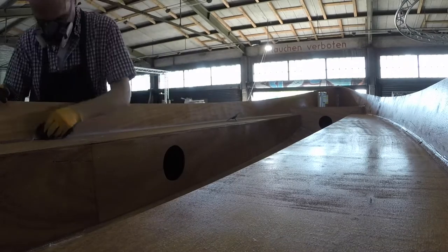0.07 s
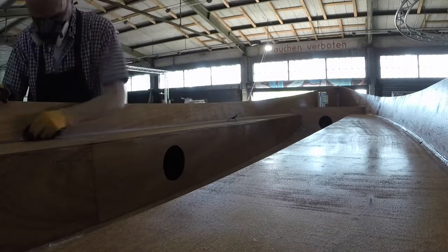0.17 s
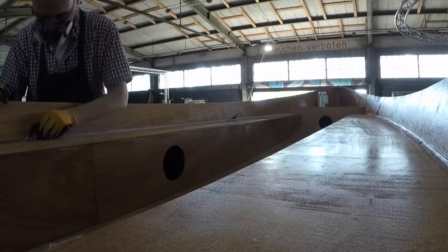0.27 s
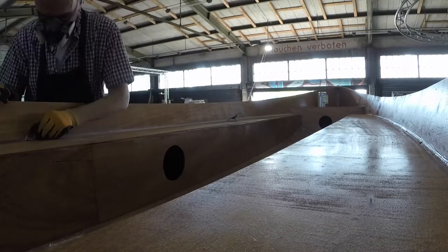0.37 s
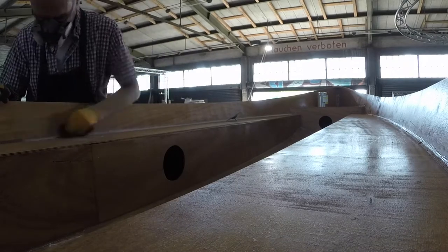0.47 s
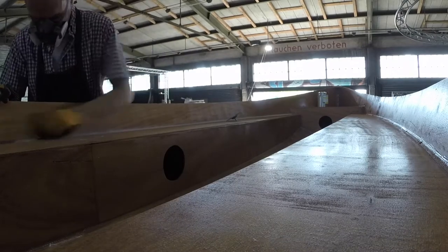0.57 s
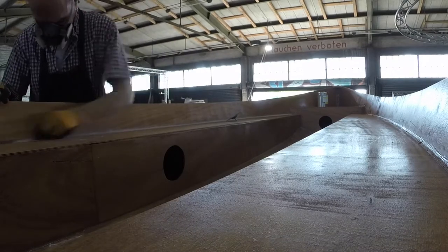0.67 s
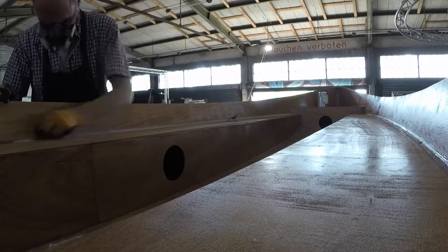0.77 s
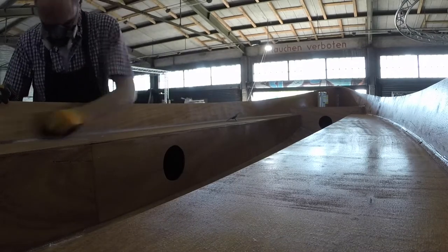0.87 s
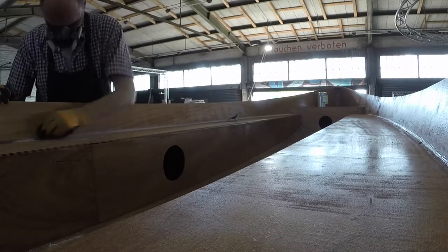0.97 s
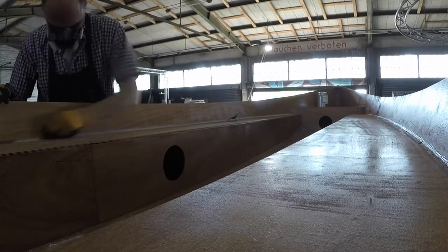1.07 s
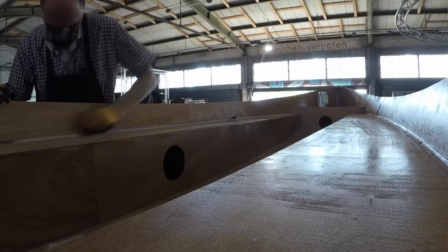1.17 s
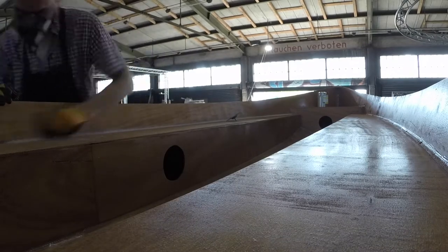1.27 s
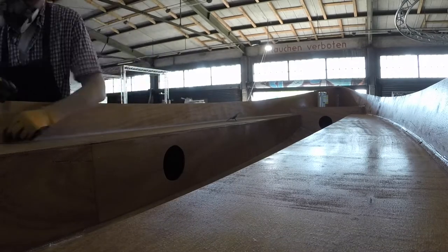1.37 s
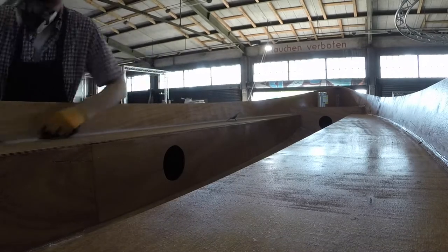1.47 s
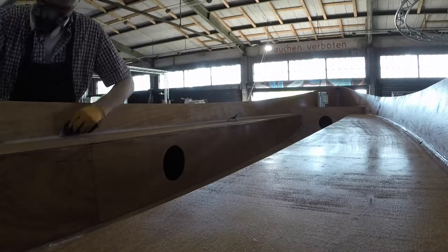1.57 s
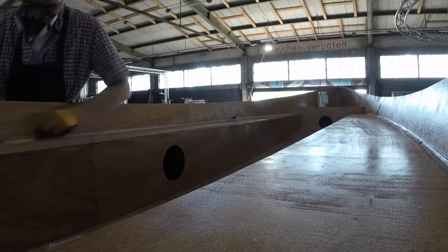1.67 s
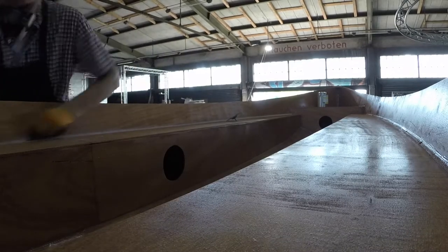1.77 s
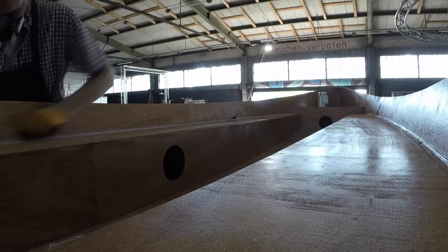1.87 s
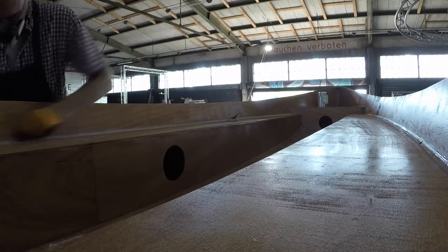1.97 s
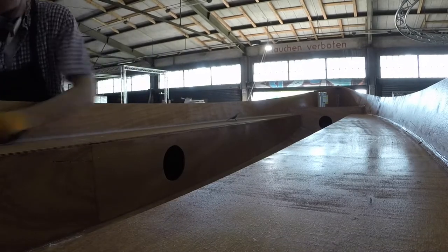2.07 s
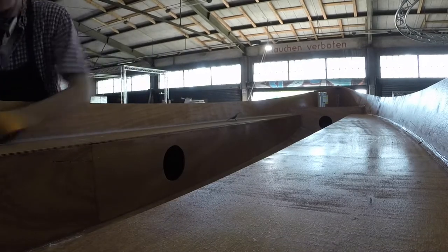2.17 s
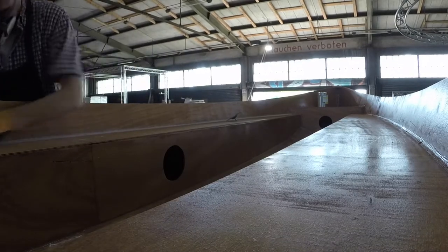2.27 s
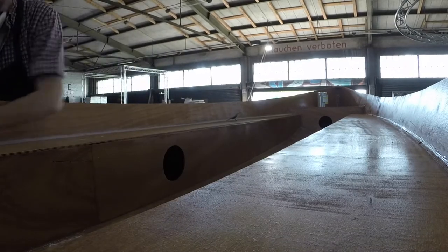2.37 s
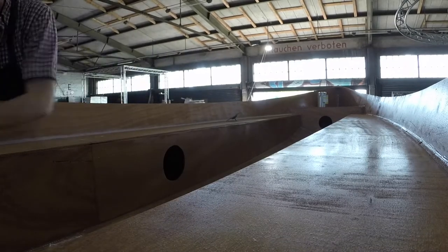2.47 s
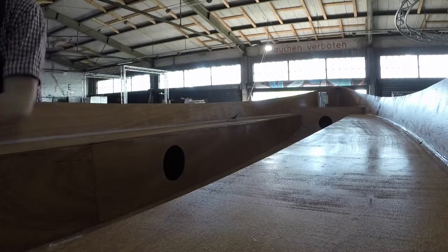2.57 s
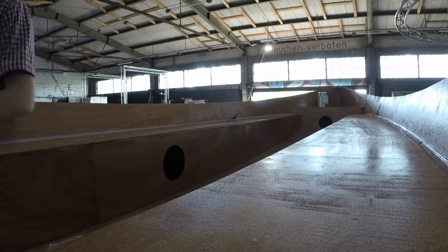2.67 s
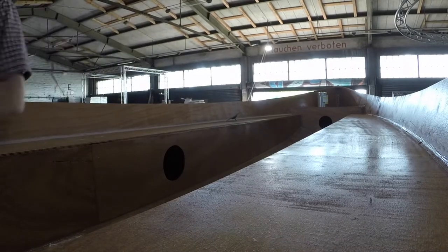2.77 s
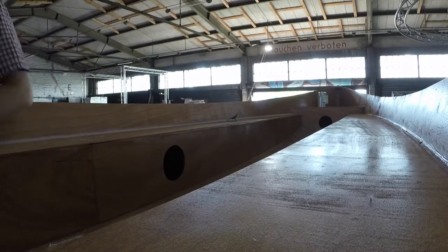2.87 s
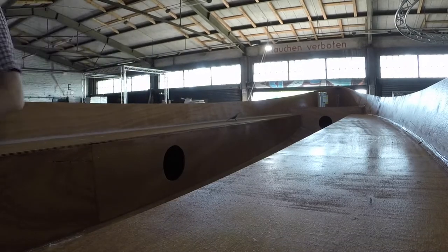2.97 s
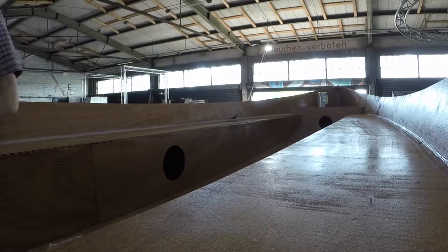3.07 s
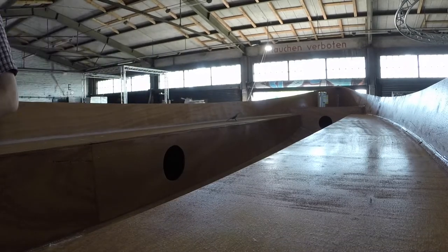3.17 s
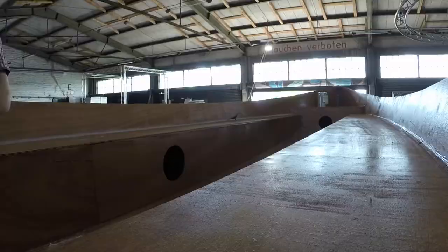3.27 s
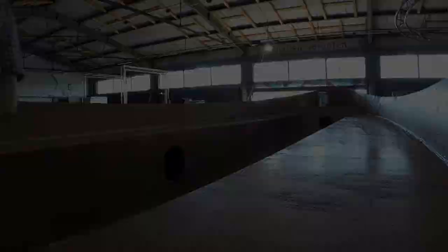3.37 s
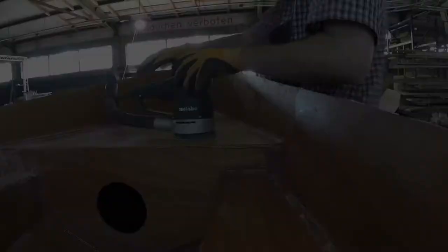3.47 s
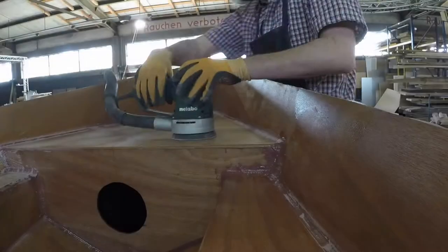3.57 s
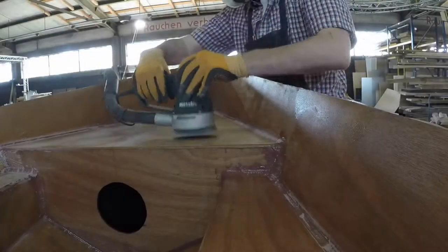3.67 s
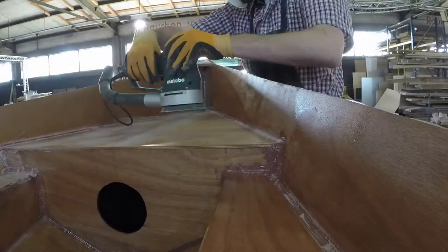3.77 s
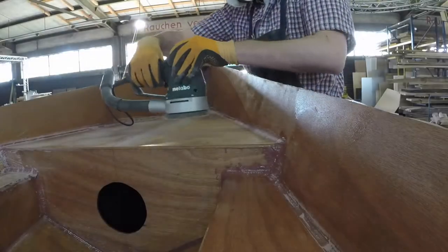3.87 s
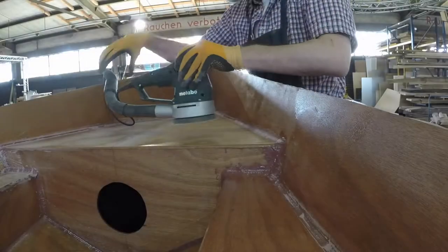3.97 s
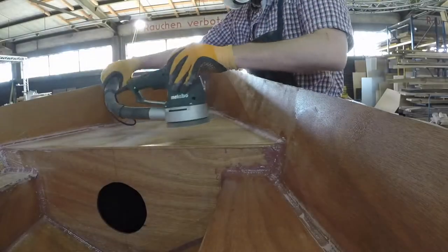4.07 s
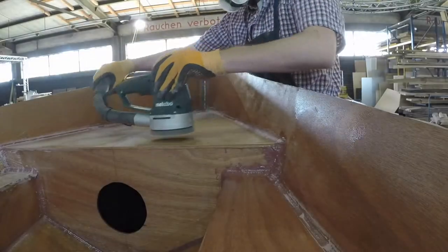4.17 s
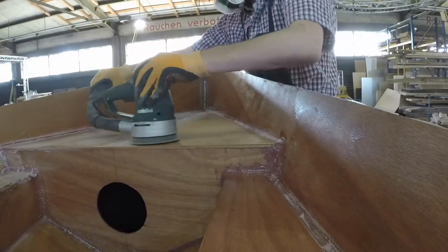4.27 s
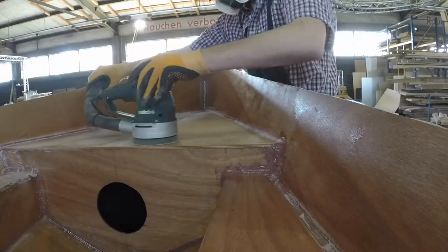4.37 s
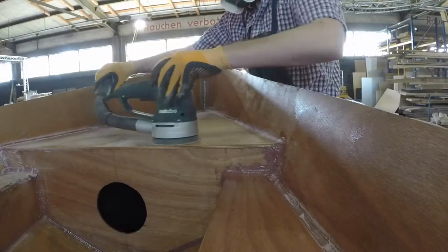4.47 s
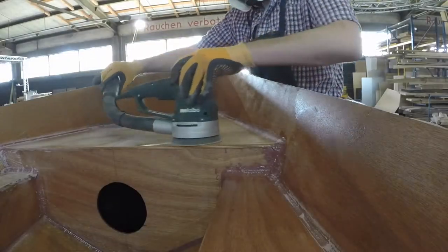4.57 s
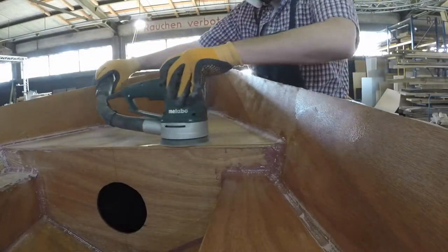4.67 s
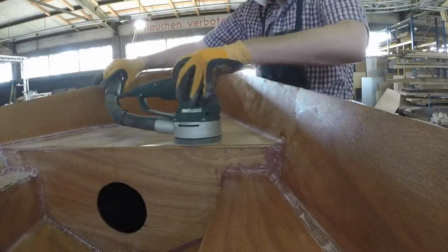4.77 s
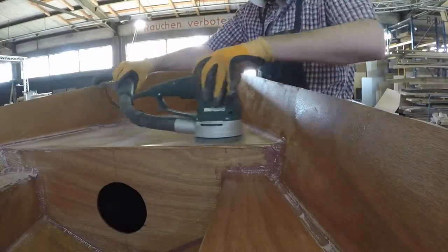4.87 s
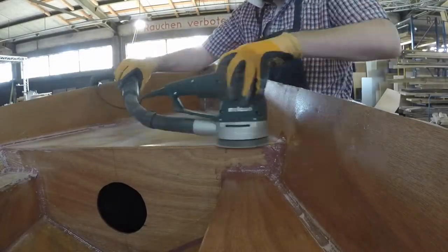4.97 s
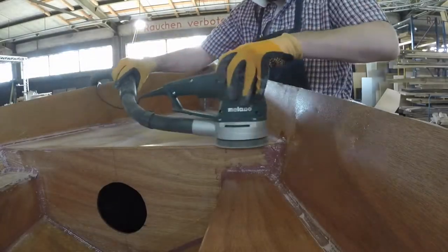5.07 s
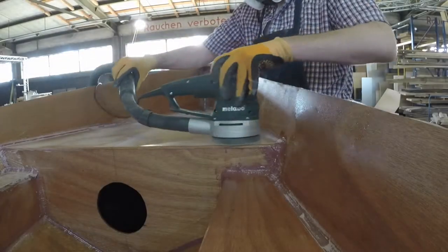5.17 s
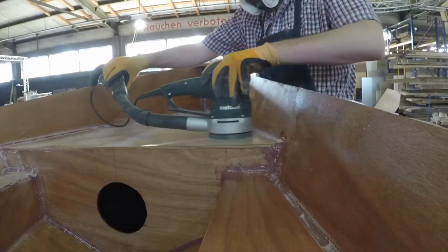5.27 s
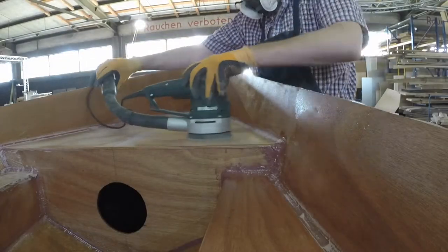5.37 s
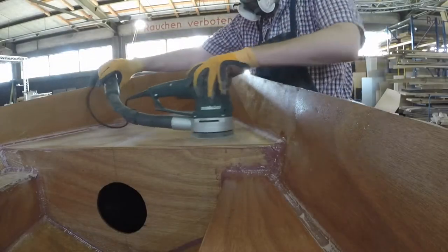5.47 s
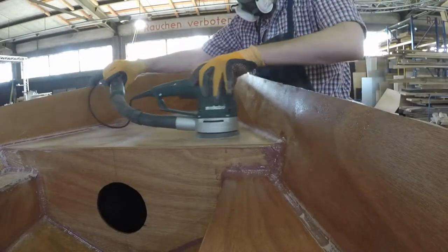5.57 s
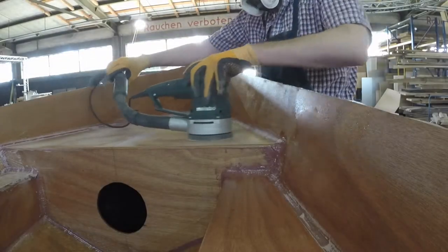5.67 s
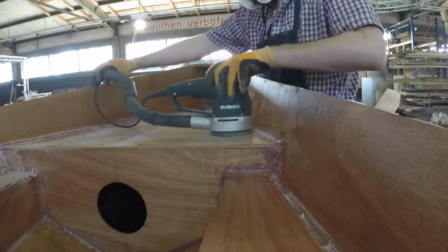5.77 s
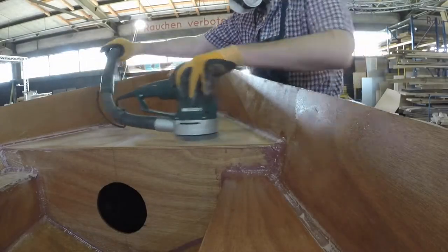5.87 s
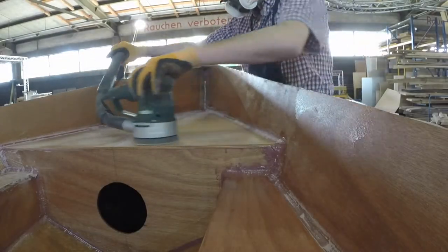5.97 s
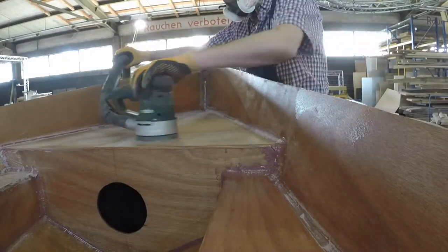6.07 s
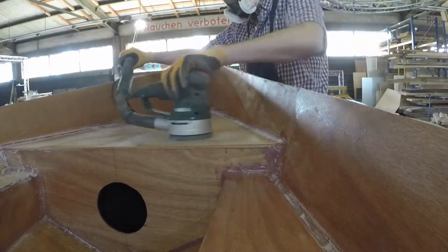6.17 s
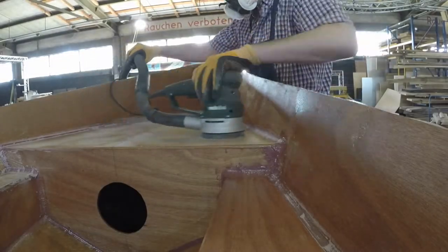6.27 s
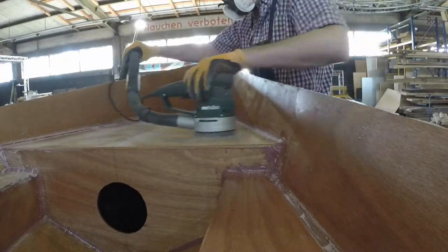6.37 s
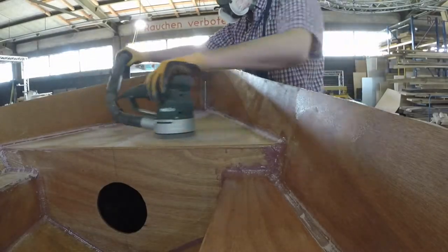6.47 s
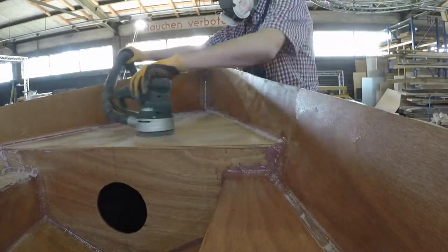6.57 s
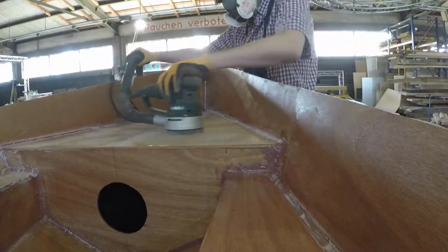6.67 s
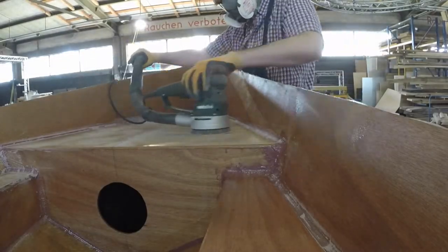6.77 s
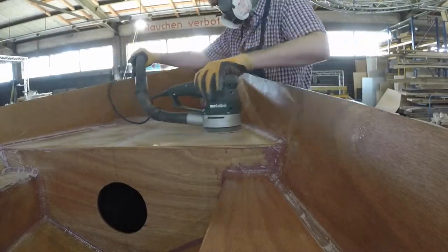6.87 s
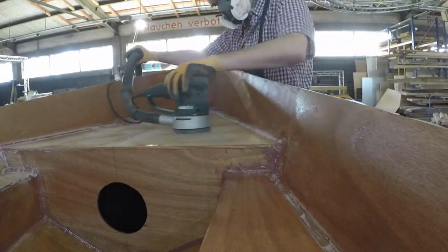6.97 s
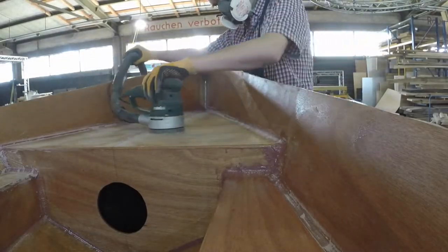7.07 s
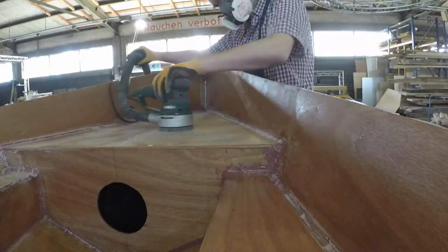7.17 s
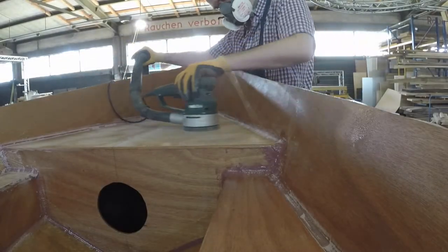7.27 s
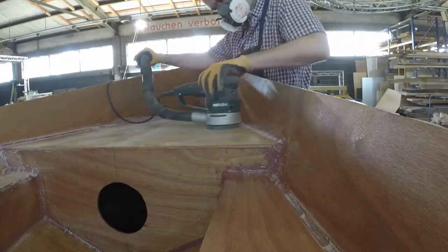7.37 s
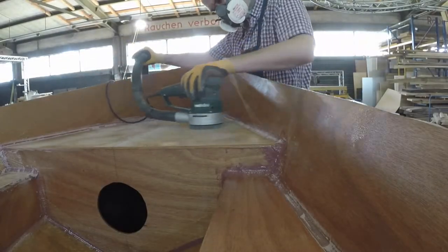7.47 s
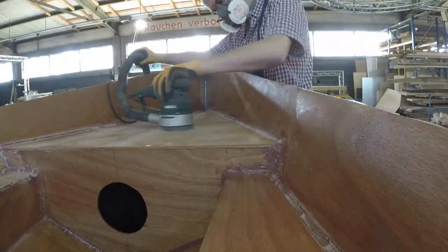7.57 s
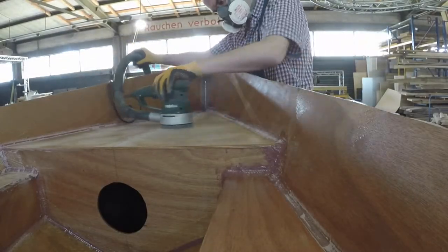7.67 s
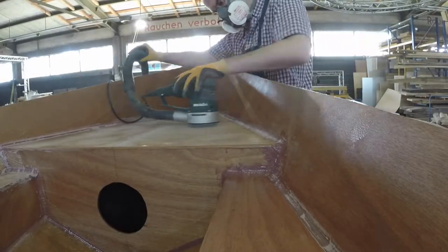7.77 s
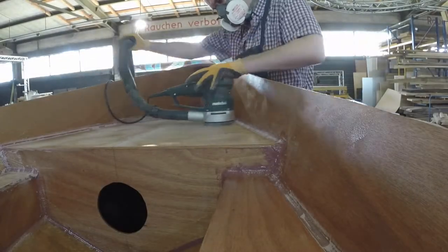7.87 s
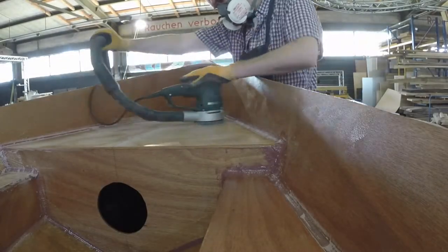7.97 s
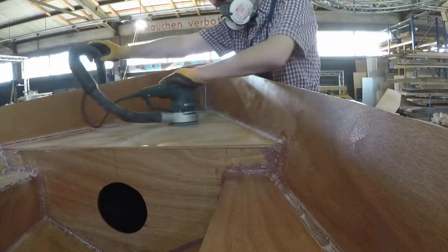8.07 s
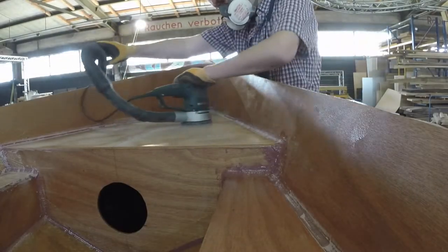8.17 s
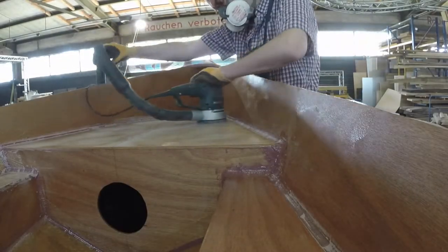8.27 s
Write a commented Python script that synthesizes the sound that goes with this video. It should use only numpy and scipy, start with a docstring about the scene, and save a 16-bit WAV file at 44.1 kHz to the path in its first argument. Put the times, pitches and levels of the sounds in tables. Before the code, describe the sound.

Close to a hollow plywood boat hull in a quiet workshop, sandpaper scrubs rapidly back and forth, dry scratches over a low woody rumble. Short hollow knocks and tiny ticks interrupt it. The strokes thin out into near silence, then an orbital sander whirs up, sags under load and settles into a buzzing drone with gritty hiss and a thin whine.

```python
"""Quick sandpaper strokes scrub a hollow plywood hull: swelling noise scratches, rumbles and shoves it.
Bumps ring the wood as fading tones, and small dry ticks fall among the strokes.
After a hush an orbital sander fades in: its orbit spins up, then sags under load. Multiples of the turn
drum the boards, with noise for loose rattle, hissing grit and air, and a fan whine on top. Low thuds join.
Faint air noise lies behind it all, later with two steady tones; a small microphone box colours the mix."""
import sys
import numpy as np
from scipy import signal
from scipy.fft import rfft, irfft
from scipy.io import wavfile
from scipy.ndimage import uniform_filter1d

SR = 44100
rng = np.random.default_rng(int(sys.argv[2]) if len(sys.argv) > 2 else 0)


def bounce(signal):
    """Save signal as a 16-bit WAV file at the path given by the first command-line argument."""
    frames = np.transpose(np.atleast_2d(signal))
    limited = np.clip(frames, -1, 1)
    pcm = np.round(limited * 32767).astype(np.int16)
    wavfile.write(sys.argv[1], SR, pcm)


N = 367353
T = np.arange(N) / SR  # time of every sample, in seconds

# All "level per Hz" spectra give a shape only; the loudness is set elsewhere.
# quiet air of the hall: (f/Hz, level per Hz/dB)
AIR_SPECTRUM = [(18, -39), (30, 0), (77, -9), (462, -9), (615, -11), (1490, -40), (2580, -34), (15100, -61)]
# steady tones of the hall: (f/Hz, average level/dB)
HALL_TONES = [(296.1, -73), (409.1, -67)]
AIR_DB = -57

# small ticks: (t/s, level/dB)
TICKS = [(0.3464, -57), (0.3556, -57), (0.378, -47), (1.6024, -49), (3.2755, -45), (3.3039, -55)]
# small cavities round the microphone that ring with each tick: (f/Hz, width/Hz, relative level/dB)
CAVITIES = [(2940, 250, -5), (5660, 200, -4), (7700, 300, -13), (10300, 370, -9)]
SNAP_DB, SNAP_S = -15, 0.002  # dry crackle at the front of each tick: level against the ring, fading time

# low thuds while sanding: (t/s, peak level/dB, f/Hz, length/s)
THUDS = [(4.93, -33, 151.9, 0.083), (5.02, -34, 80.3, 0.043), (5.913, -34, 120.4, 0.048),
         (7.712, -26, 279, 0.049)]
# bumps on the hull: (t/s, peak level/dB, hardness as pulse cut-off f/Hz)
BUMPS = [(0.582, -42, 800), (1.004, -33, 900), (1.62, -23.5, 476), (1.649, -27.5, 420), (1.876, -24.5, 900),
         (2.098, -21.5, 1050), (2.402, -23, 810), (2.834, -29.5, 650), (2.92, -26, 740), (2.938, -36, 600),
         (3, -27, 3200), (3.262, -35.5, 490), (3.501, -42, 800)]
# ringing tones (modes) of the hull: (f/Hz, relative level/dB, time to fade by 60 dB/s)
HULL_MODES = [(280, -14.5, 0.064), (419, 0, 0.051), (527.5, 4.5, 0.042), (660, -20, 0.055),
              (797, 13, 0.026), (1177, 7, 0.043), (1340, -5, 0.079), (1460, 11, 0.026), (1950, 1, 0.021),
              (2250, 3, 0.016), (2950, -6, .021)]

# sandpaper strokes, single or in even runs that begin with a push:
# (start t/s, end t/s before the overlap, count, scratch level/dB, hull rumble level/dB)
STROKES = [(0.0, 0.049, 1, -40.5, -31.5), (0.038, 0.094, 1, -56, -41.5), (0.125, 0.252, 2, -44, -31.5),
           (0.25, 0.28, 1, -56.5, -40), (0.284, 0.389, 2, -80, -52), (0.455, 0.487, 1, -73, -73),
           (0.494, 0.558, 1, -47, -34), (0.557, 0.673, 2, -42, -30), (0.673, 1.086, 8, -39.5, -33),
           (1.086, 1.211, 2, -40.5, -36), (1.211, 1.313, 1, -38, -31.5), (1.306, 1.362, 1, -42.5, -39),
           (1.365, 1.444, 1, -43, -36.5), (1.402, 1.556, 1, -57, -44), (1.556, 1.597, 1, -60, -50),
           (1.6, 1.646, 1, -55, -34.5), (1.653, 1.793, 1, -57, -49), (1.726, 1.801, 1, -42, -35),
           (1.801, 1.854, 1, -42, -33), (1.852, 2.742, 17, -40, -33), (2.738, 2.79, 1, -61, -49),
           (2.823, 2.857, 1, -63, -44), (2.85, 2.902, 1, -56, -44.5), (2.912, 2.953, 1, -54, -37),
           (2.995, 3.016, 1, -54, -29.5), (3.026, 3.088, 1, -59.5, -42), (3.085, 3.153, 2, -58.5, -43),
           (3.263, 3.293, 1, -64, -76), (3.319, 3.446, 2, -68, -70), (3.446, 3.53, 2, -62, -52.5)]
# dull part of the paper's scratch: (f/Hz, level per Hz/dB)
SCRATCH_SPECTRUM = [(530, -31), (900, 0), (1060, -9.5), (1250, 4.5), (1500, -5.5), (1740, -14.5),
                    (1890, -12), (2970, -14), (3540, -17.5), (6320, -19.5), (7190, -39), (10300, -42.5),
                    (15100, -66)]
# brightest part of the scratch: (f/Hz, level per Hz/dB)
FIZZ_SPECTRUM = [(3800, -5.5), (4600, -6), (5200, -6), (6400, -4.5), (7300, -13.5), (10000, -11.5),
                 (15000, -27.5)]
# hull shaking under the paper: (f/Hz, level per Hz/dB)
RUMBLE_SPECTRUM = [(88, -72), (150, -20), (405, -6), (451, -8), (528, 0), (737, -3.5), (916, -16),
                   (1100, -24), (1430, -28), (2420, -120)]
# low shove of the hand on the hull: (f/Hz, level per Hz/dB)
SHOVE_SPECTRUM = [(15, -16), (35, -4.5), (70, 2), (130, -3), (300, -59)]
# change for the weaker pull back in a longer run: (scratch level/dB, rumble level/dB, shove level/dB)
PULL_BACK_DB = -2, -1, -4
# chance spread between strokes of a longer run: (scratch level/dB, rumble level/dB, shove level/dB)
UNEVEN_DB = 0.3, 1.2, 5.5
OVERLAP = 1.08  # a stroke lasts this many times the step to the next
PULL_LATE_S = 0.001  # in a longer run each pull back starts this much late
FIRM_RUMBLE_DB, SHOVE_DB = -33, -51.5  # rumble and low shove of a firm stroke
SHOVE_FOLLOW = 0.42  # dB that the shove gains per dB of rumble

# orbit of the pad, before small chance wavers:
# (t/s, turns per second/Hz, average level/dB of the first, second and third multiple)
ORBIT = [(3.92, 56.04, -88, -63, -70), (3.99, 59.8, -62, -59, -58), (4.34, 82.8, -66, -47.5, -51),
         (4.45, 82.9, -49, -50.5, -46), (4.66, 73.3, -57, -37, -46), (4.86, 70.2, -44, -51.5, -52),
         (5.02, 67.8, -50, -49, -54.5), (5.29, 70.04, -52, -52, -53), (5.43, 65.6, -38.5, -45, -55),
         (5.6, 63.4, -52, -47, -54), (5.84, 63.4, -50, -46, -42.5), (6.44, 63.85, -50.5, -45.5, -50.5),
         (6.87, 61.44, -45, -48, -35.5), (7.0, 59.9, -52, -36.5, -44.5), (7.22, 62.3, -42, -37, -33.5),
         (7.3, 62.64, -50, -46, -39), (7.59, 61.1, -44, -35, -37.5), (7.91, 63.03, -54, -39.5, -38),
         (8.1, 62.5, -42, -35.5, -54), (8.33, 65.3, -38, -37, -32)]
# pad on the wood: (t/s, drumming level/dB, hiss level/dB, share of clean drumming/0-1)
PAD = [(3.6, -64, -64, 0.78), (3.76, -57, -59, 0.5), (3.77, -55.5, -56.5, 0.54), (4.05, -40, -50.5, 0.75),
       (4.43, -34.5, -47.5, 0.84), (4.51, -36, -43.5, 0.75), (5.13, -31.5, -43.5, 0.81),
       (5.51, -31.5, -39, 0.78), (5.9, -27.5, -40.5, 0.77), (6.16, -31.5, -40, 0.76),
       (6.23, -26.5, -36, 0.8), (6.48, -28, -40, 0.75), (6.5, -33, -37.5, 0.84), (6.7, -26.5, -38.5, 0.8),
       (6.97, -27.5, -34, 0.76), (7.17, -30, -38, 0.73), (7.21, -24, -37, 0.67), (7.3, -29.5, -36, 1),
       (7.35, -25.5, -36, 0.8), (7.63, -29.5, -35.5, 0.72), (7.68, -27.5, -39, 0.71),
       (7.96, -23.5, -35, 0.94), (8.14, -27, -38.5, 0.74), (8.33, -29.5, -35.5, 0.78)]
# how strongly the board answers the upper multiples: (f/Hz, relative level/dB)
DRUM_RESPONSE = [(200, -22), (250, -12.5), (310, -8.5), (375, -17), (440, -11), (500, -3), (545, -4.5),
                 (630, 0), (700, -3), (760, -9), (830, -14.5), (1000, -68)]
# loose rattle between the multiples: (f/Hz, level per Hz/dB)
RATTLE_SPECTRUM = [(18, -46), (30, -21), (183, -5), (236, -11), (310, -2.5), (361, -2), (487, -1), (630, 7),
                   (1100, -12.5), (1430, -62), (2420, -120)]
# hiss of grit and air: (f/Hz, level per Hz/dB)
HISS_SPECTRUM = [(530, -11.5), (900, 2), (966, -7), (1190, -7.5), (1550, -13), (2930, -11.5), (3540, -17.5),
                 (4590, -8), (5230, -15), (6470, -17), (8490, -24.5), (9440, -22), (13000, -36.5),
                 (15100, -50)]
# brighter hiss of the biting grit: (f/Hz, level per Hz/dB)
BITE_SPECTRUM = [(1200, -34), (1800, 1.5), (4000, -0.5), (7000, -8), (9000, -15), (13000, -15.5),
                 (15000, -23)]
FAN_MULTIPLE, WHINE_DB = 19, -14.5  # fan blades: multiple of the orbit, peak against the hiss once pressed
PRESS_S = 4.44  # time at which the pad starts to be pressed down
ROCK_DB, ROCK_HZ = 2.6, 13  # the low multiples waver as the pad rocks

# humps and dips of the microphone box: (f/Hz, width/Hz, level/dB)
BOX = [(1690, 67, -1.5), (2990, 590, 5), (3520, 220, -4.5), (8460, 210, -5), (11500, 950, -4)]
EDGE_HZ = 15290  # top of the microphone's band


def amp(db):
    """Turns decibels into a plain multiplying factor."""
    return 10 ** (np.asarray(db) / 20)


def evened(x):
    """Scales x to an average (rms) level of one."""
    return x / np.sqrt(np.mean(abs(x) ** 2) + 1e-20)


def columns(rows):
    """Draws straight lines between the timed rows of a table, one curve for each column."""
    s, *values = np.transpose(rows)
    return [np.interp(T, s, v) for v in values]


def read(points, hz):
    """Reads a spectrum between its points, on a pitch-like (logarithmic) scale."""
    f, value = np.transpose(points)
    return np.interp(np.log(hz + 1), np.log(f + 1), value)


def colour(x, spectrum):
    """Gives x the spectrum, scaled so that unit white noise comes out at unit level."""
    gain = evened(amp(read(spectrum, np.fft.rfftfreq(N, 1 / SR))))
    return irfft(rfft(x) * gain, N)


def slow(hz):
    """Smooth chance wandering of unit level, up to about hz."""
    width = max(round(SR / hz), 1)
    once = uniform_filter1d(rng.standard_normal(N), width)
    return evened(uniform_filter1d(once, width))


def grit(spread_db, flutter_hz):
    """Noise whose level flutters by chance, as when grains catch and slip."""
    return evened(rng.standard_normal(N) * amp(spread_db * slow(flutter_hz)))


def add(mix, s, sound):
    """Adds a sound to the mix at time s, cut off at the end of the mix."""
    part = mix[round(s * SR):][:len(sound)]
    part += sound[:len(part)]


def hall():
    """Quiet air noise; from 3.4 s it drops while two faint, wavering tones rise."""
    later = np.clip((T - 3.4) / 0.13, 0, 1)
    tones = 0
    for hz, db in HALL_TONES:
        tones = tones + np.sqrt(2) * amp(db + 1.5 * slow(11.0)) * np.sin(2 * np.pi * hz * T)
    air = colour(grit(5.3, 12), AIR_SPECTRUM)
    return amp(AIR_DB - 11.5 * later) * air + tones * later


def ticks():
    """Short dry bursts that ring the small cavities round the microphone."""
    out, t = np.zeros(N), T[:400]
    for s, db in TICKS:
        ring = 0
        for hz, width, mode_db in CAVITIES:
            # a wider resonance dies sooner
            ring = ring + amp(mode_db) * np.sin(2 * np.pi * hz * t) * np.exp(-np.pi * width * t)
        build_up = 1 - np.exp(-t / 0.00072)
        snap = amp(SNAP_DB) * rng.standard_normal(len(t)) * np.exp(-t / SNAP_S)
        add(out, s, amp(db) * (ring * build_up + snap))
    return out


def thuds():
    """Each low thud is one steady pitch that swells and fades smoothly."""
    out = np.zeros(N)
    for s, db, hz, length in THUDS:
        t = np.arange(0, length, 1 / SR)
        swell = np.sin(np.pi * t / length) ** 2
        add(out, s, amp(db) * swell * np.sin(2 * np.pi * hz * t))
    return out


def bumps():
    """A soft pulse rings the hull modes; harder blows reach the higher ones."""
    out, t = np.zeros(N), T[:6000]
    for s, db, hard_hz in BUMPS:
        ring = 0
        for (hz, mode_db, t60), phase in zip(HULL_MODES, rng.random(len(HULL_MODES))):
            fading = amp(mode_db - 60 * t / t60)
            reach = 1 / (1 + (hz / hard_hz) ** 4)
            ring = ring + fading * reach * np.sin(2 * np.pi * (hz * t + phase))
        ring = ring * (1 - np.exp(-t * hard_hz / 3.5)) ** 2  # softer blows take longer to build
        add(out, s, amp(db) * ring / abs(ring).max())
    return out


def strokes():
    """Each stroke swells with hand speed and stops at the turn; it scratches, shakes and shoves the hull."""
    scratch, rumble, shove = np.zeros((3, N))
    for start, end, count, scratch_db, rumble_db in STROKES:
        length = (end - start) / count
        swell = np.sin(np.pi * np.arange(0, 1, 1 / (OVERLAP * length * SR)))
        shove_db = SHOVE_DB + SHOVE_FOLLOW * (rumble_db - FIRM_RUMBLE_DB)
        long_run = count > 2  # only longer runs get a weaker pull and chance levels
        for k, chance in enumerate(rng.standard_normal((count, 3))):
            pull = k % 2 * long_run
            levels_db = np.array([scratch_db, rumble_db, shove_db]) + np.multiply(PULL_BACK_DB, pull)
            levels_db = levels_db + np.multiply(UNEVEN_DB, chance) * long_run
            scratch_amp, rumble_amp, shove_amp = amp(levels_db)
            s = start + k * length + PULL_LATE_S * pull
            add(scratch, s, scratch_amp * swell ** 1.11)
            add(rumble, s, rumble_amp * swell ** 0.56)
            add(shove, s, shove_amp * swell)
    dull = colour(grit(0.82, 550), SCRATCH_SPECTRUM)
    # the brightest fizz comes and goes with the patch of paper in contact
    fizz = colour(grit(2.5, 280) * amp(1.1 * slow(27)), FIZZ_SPECTRUM)
    paper = scratch * (dull + amp(-9.5) * fizz)
    shaking = colour(rumble * grit(2.34, 240), RUMBLE_SPECTRUM)
    shoving = colour(shove * grit(2.0, 50), SHOVE_SPECTRUM)
    return paper + shaking + shoving


def low_multiples(turn, levels_db):
    """The first three multiples of the orbit hum as plain tones that waver as the pad rocks."""
    low = 0
    for k, db in enumerate(levels_db, 1):
        level = np.sqrt(2) * amp(db + ROCK_DB * slow(ROCK_HZ))
        low = low + level * np.cos(k * turn + 0.954 * k ** 2 + 0.94 * slow(3.2))
    return low * np.clip((T - ORBIT[0][0]) / 0.05, 0, 1)


def drumming(turn, speed):
    """One blow a turn rings the board: multiples 4 to 15 of the orbit, as loud as the board answers."""
    drum = 0
    for k in range(4, 16):
        # every multiple wavers by itself as the pad rocks over the board
        waver = (1 + 0.51 * slow(6.5)) * np.exp(0.25j * slow(2.7))
        phase = k * turn + 0.2 * min(k - 7, 0) ** 2 + 0.03 * k ** 2
        drum = drum + amp(read(DRUM_RESPONSE, k * speed)) * (waver * np.exp(1j * phase)).real
    drum = drum * amp(2.1 * slow(30))  # blows differ in strength from turn to turn
    # hold the average over a quarter second at one, so the pad table sets the loudness
    return drum / np.sqrt(uniform_filter1d(drum ** 2, SR // 4))


def sander():
    """The turning orbit drums the board; rattle and biting grit throb with the same turn, under hiss."""
    speed, *low_db = columns(ORBIT)
    drum_db, hiss_db, clean = columns(PAD)
    fade_in = np.clip((T - PAD[0][0] + 0.24) / 0.24, 0, 1)
    turn = 2 * np.pi * np.cumsum(speed * (1 + 0.0021 * slow(32.83))) / SR  # angle in radians
    low = low_multiples(turn, low_db)
    drum = drumming(turn, speed)
    rattle = colour(grit(2.0, 290) * (1 + 0.12 * np.cos(turn)), RATTLE_SPECTRUM)
    body = amp(drum_db) * (np.sqrt(clean) * drum + np.sqrt(1 - clean) * rattle)
    # once the pad is pressed down the grit bites: brighter hiss, louder whine
    pressed = np.clip((T - PRESS_S) / 0.04, 0, 1)
    whine = amp(WHINE_DB + 2 * slow(8.1)) * np.cos(FAN_MULTIPLE * turn + slow(17))
    whine = whine * (1 + pressed) / 2
    hiss = colour(grit(0.33, 150) * amp(0.26 * slow(43)), HISS_SPECTRUM)
    throb = 1 + 0.13 * np.cos(turn)
    bite = colour(grit(1.7, 300) * throb * amp(1.2 * slow(12)), BITE_SPECTRUM)
    bite = bite * amp(-8.5) * pressed
    return low + fade_in * (body + amp(hiss_db) * (hiss + bite + whine))


def echo(x, t60, wet_db):
    """A short tail of dying noise from inside the hollow hull; t60 is the seconds to fade by 60 dB."""
    tail = rng.standard_normal(SR // 4) * amp(-60 * T[:SR // 4] / t60)
    tail = tail / np.linalg.norm(tail)
    return x + amp(wet_db) * signal.oaconvolve(x, tail)[:N]


def scene():
    """Strokes, bumps, thuds and ticks get the hull's echo; the sander and hall join without it."""
    echoing = echo(ticks() + thuds() + bumps() + strokes(), 0.16, -10.5)
    return (hall() + echoing + sander())[None]


def record(dry):
    """The microphone box colours everything alike; then a filter removes what lies above its band."""
    hz = np.fft.rfftfreq(N, 1 / SR)
    box_db = sum(db / (1 + (2 * (hz - f) / width) ** 2) for f, width, db in BOX)
    boxed = irfft(rfft(dry) * amp(box_db), N)
    band_limit = signal.firwin(2047, EDGE_HZ, window=("kaiser", 12), fs=SR)
    return signal.oaconvolve(boxed, band_limit[None], "same")


dry = scene()
out = record(dry)
bounce(out)
```